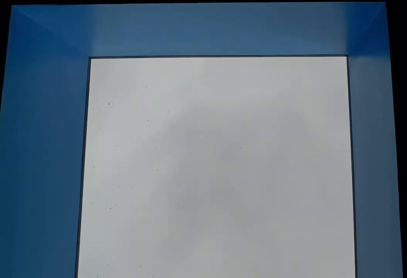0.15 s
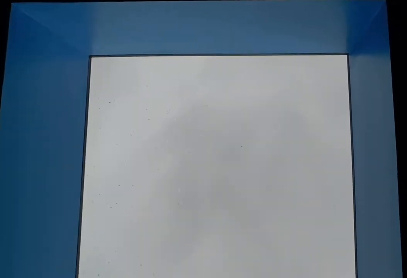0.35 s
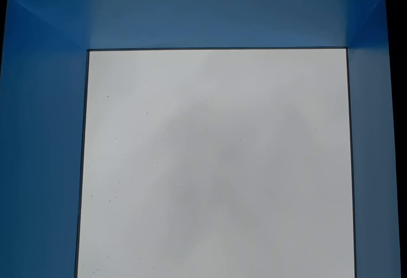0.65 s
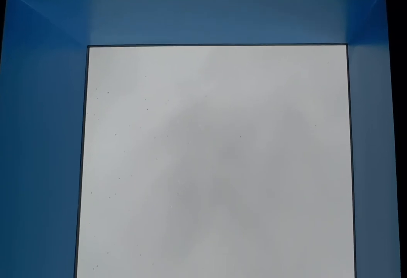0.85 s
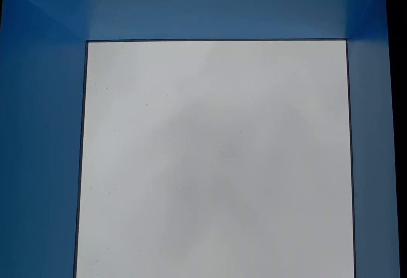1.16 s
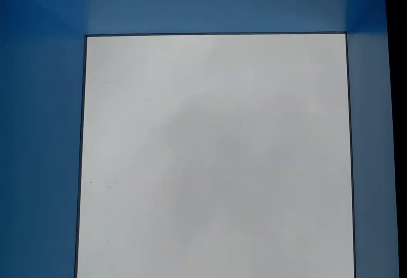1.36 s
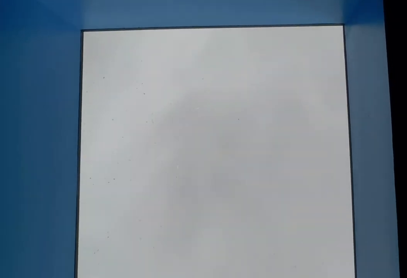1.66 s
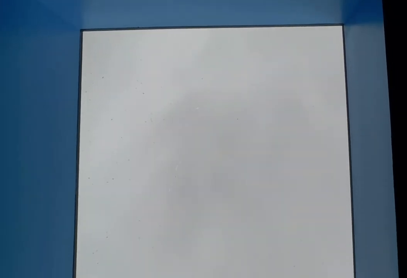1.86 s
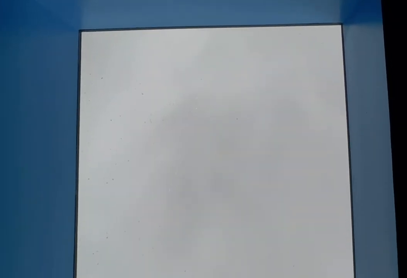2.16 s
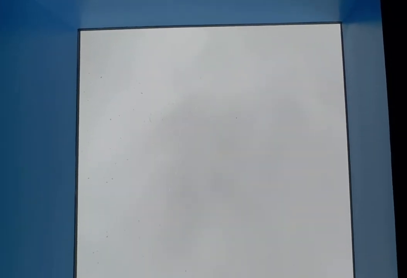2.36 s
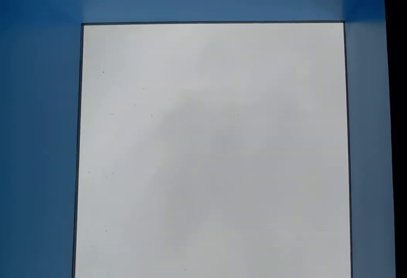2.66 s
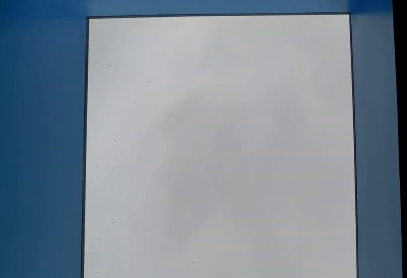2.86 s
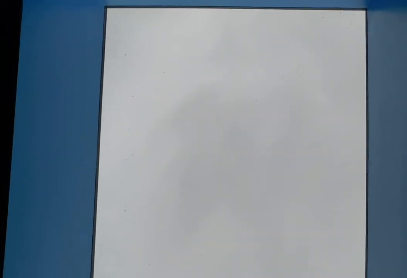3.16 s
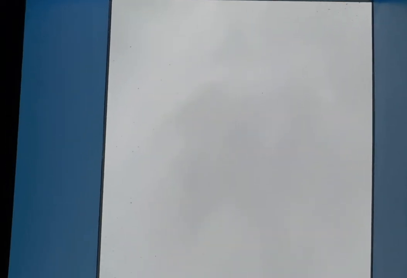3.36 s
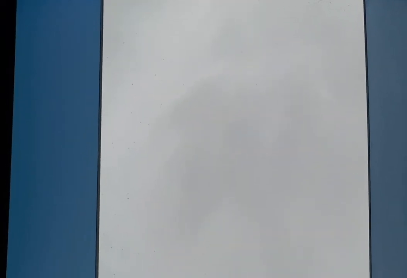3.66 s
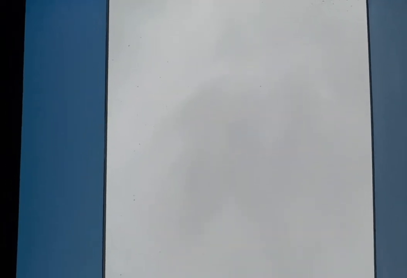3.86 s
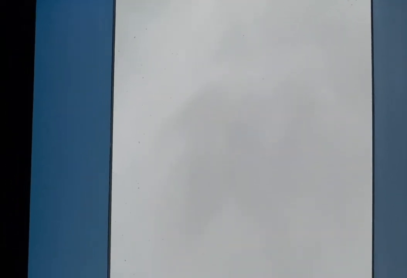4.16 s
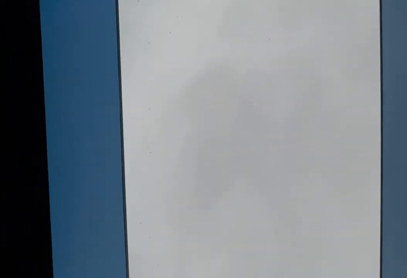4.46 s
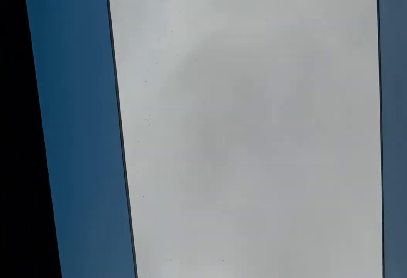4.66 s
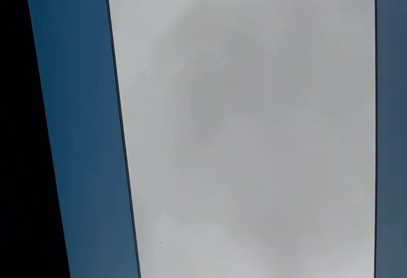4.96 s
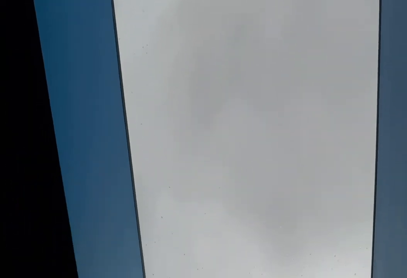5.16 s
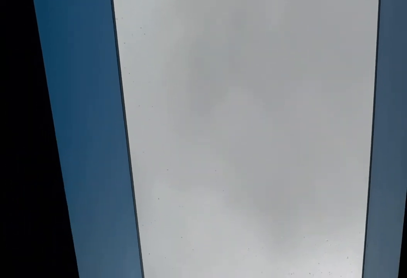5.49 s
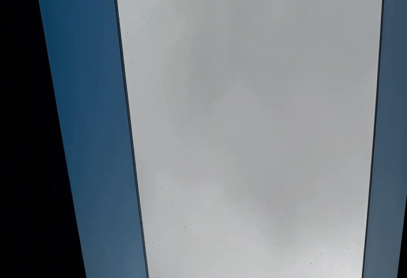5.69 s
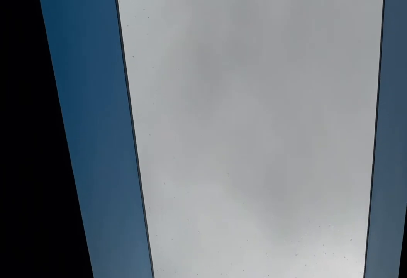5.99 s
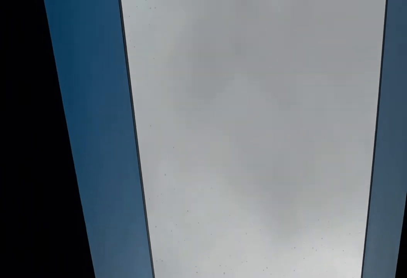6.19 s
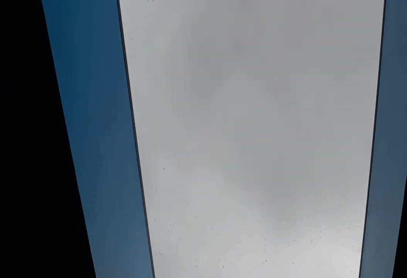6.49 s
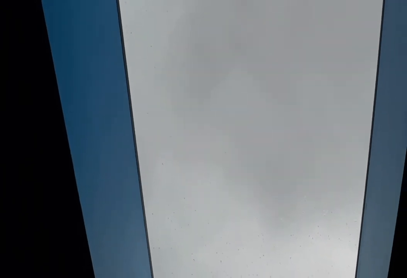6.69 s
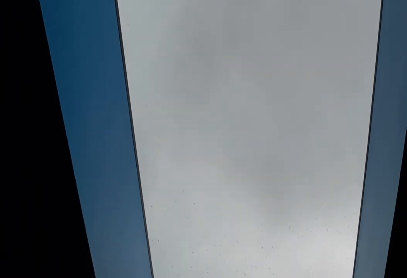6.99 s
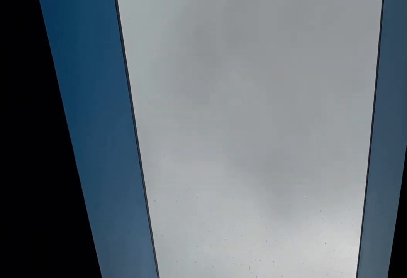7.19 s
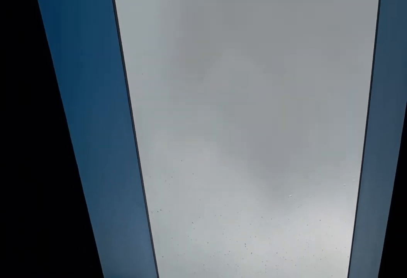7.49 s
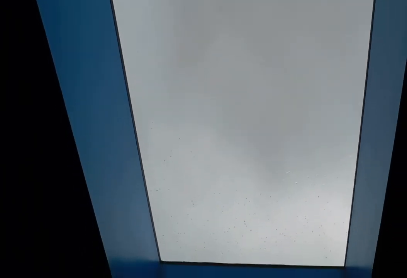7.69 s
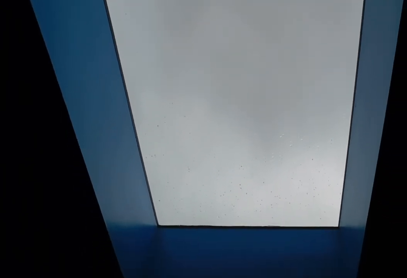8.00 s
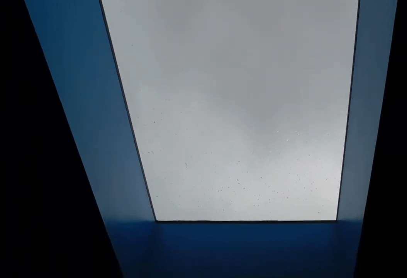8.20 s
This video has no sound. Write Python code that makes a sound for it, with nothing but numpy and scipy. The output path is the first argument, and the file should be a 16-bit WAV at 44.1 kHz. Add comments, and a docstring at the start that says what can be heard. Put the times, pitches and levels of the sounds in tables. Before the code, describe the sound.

Light rain falls on a glass skylight, heard from the quiet room below on a hand-held stereo microphone. Half a second in, a very loud, hard double rattle strikes close on the right. Around three seconds fingers click, clack and rub the casing with a soft bump. Then the drops gradually crowd together, brighter and busier, with sharper ticks from larger drops.

```python
"""Light rain on a glass skylight, heard in the room below on a hand-held stereo camera; the shower thickens.
Each drop is a noise burst of ticks plus a short ring of glass and light shaft; the ticks brighten with the tilt.
Close to the microphones, housing modes give a loud rattling knock and later a faint one.
Gripping fingers add clacks, ticks, grainy rubs, a soft bump and low rumble, over the still air of the room."""
import sys
import numpy as np
from scipy import signal
from scipy.fft import rfft, irfft
from scipy.io import wavfile

SR = 44100
rng = np.random.default_rng(int(sys.argv[2]) if len(sys.argv) > 2 else 0)


def dump_mix(stems):
    """Bounce the given channels to the path in sys.argv[1] as a 16-bit WAV at rate SR."""
    frames = np.atleast_2d(stems).T  # one column per channel
    limited = np.clip(frames, -1, 1)  # hard clip at full scale
    pcm = np.round(limited * 32767).astype(np.int16)
    wavfile.write(sys.argv[1], SR, pcm)


N = 367794
T = np.arange(N) / SR  # t/s

# strength of the shower overhead: [t/s, relative level/dB]
SHOWER_STRENGTH = [(0.0, -62.5), (0.59, -64.5), (1.31, -63.5), (1.74, -65.5), (1.94, -65.5), (2.2, -62.5),
                   (2.75, -62.5), (3.85, -63), (4.02, -63), (4.22, -61.5), (6.0, -58.5), (6.44, -60),
                   (7.41, -57), (8.0, -57), (8.34, -59)]
# largest drops on the pane: [t/s, relative level/dB, tick gain from 13 kHz up against 9 kHz and below/dB]
LARGE_DROPS = [(.021, -41, 2), (.149, -48, 0), (.181, -42.5, 0), (.389, -44, -2), (.842, -38, -2),
               (.868, -42.5, 0), (.9687, -44, 6), (1.0815, -39.5, 0), (1.2416, -43, 6), (1.9637, -41, -3),
               (2.0637, -39.5, 4), (2.1707, -38.5, 2), (2.3814, -39.5, 0), (2.7464, -42, 6),
               (3.7227, -36.5, -3), (4.0202, -38.5, -2), (4.0782, -41, 1), (4.1807, -41, 1),
               (4.7406, -39, 1), (4.9137, -41, 0), (5.609, -39, 2), (5.9507, -39, 1), (6.0465, -39, 2),
               (6.3967, -40.5, 2), (6.6306, -40.5, 1), (6.7141, -37.5, 0), (6.8059, -36, 0),
               (6.9361, -37, 1), (6.978, -34.5, -1), (7.121, -37, 0), (7.1771, -38.5, 2), (7.2233, -39, 2),
               (7.2454, -35.5, 1), (7.3417, -36.5, -4), (7.798, -39, -2)]
# ring of the pane as it reaches the room: [f/Hz, relative level/dB]
PANE_COLOUR = [(90, -23.5), (160, -12), (300, -7.5), (480, -6), (750, -2), (1200, -2.5), (1750, -0.5),
               (2050, -1), (2450, 1), (3100, -3), (4000, -8.5), (6000, -12.5), (15000, -26.5)]
# splash of a drop on the glass: [f/Hz, relative level/dB]
SPLASH_COLOUR = [(300, -21), (1500, -7), (3500, -7), (5800, -2), (8500, 3), (11000, 2), (13500, -1),
                 (16000, -6)]
# tilt of the camera up under the pane: [t/s, share of the turn/0-1]
CAMERA_TILT = [(0, 0), (2.6, .1), (5, 0.84)]
# loose part striking the housing: [t/s, relative blow level/dB, relative level of the chatter after it/dB]
HOUSING_BLOWS = [(0.5067, 12, -5), (.5169, 10, 4), (2.5795, -4, -32)]
# grazes on the way to each blow: [time ahead of it/s, level under it/dB]
BLOW_GRAZES = [(.0035, 15), (0.00089, 8)]
# modes of the housing: [f/Hz, relative level/dB, t60/s]
HOUSING_MODES = [(980, -22, .012), (1140, -10.5, 0.011), (1470, -12, 0.017), (2200, -32, .014),
                 (2460, -12, 0.01), (3480, -15, 0.022), (3940, -7, 0.014), (4130, -1.5, 0.015),
                 (4720, 1, 0.011), (5750, -5.5, 0.012), (6450, -16, 0.013), (9150, -9, 0.013),
                 (10900, -22, .006)]
# clatter of the housing through the air: [f/Hz, relative level/dB]
CLATTER_COLOUR = [(100, -15), (350, -31.5), (620, -12), (950, -8), (1400, -3), (1900, -0.5), (2600, -2.5),
                  (4300, -4), (6000, -9.5), (15000, -24)]
# crack of two hard faces meeting: [f/Hz, relative level/dB]
CRACK_COLOUR = [(300, -19), (1000, -8), (4500, 3.5), (6500, 1), (7800, -22), (10000, 0), (13000, -11.5),
                (16000, -16)]
# fingers catching on the shell:
# [t/s, relative clack level/dB, relative tick level/dB, rocking level/dB, left minus right of clack and tick/dB]
GRIP_SHIFTS = [(2.8598, -15, -19.5, -54, -9), (2.8652, -20, -20, -66, -8), (2.8937, -17, -15, -66, -7),
               (3.0325, -17, -18, -59, -1), (3.157, -9, -10, -49.5, -2), (3.4284, -37, -13, -80, 2),
               (3.534, -30, -9, -79.5, 5), (3.5464, -16, -8.5, -80, 5), (3.5563, -6.5, -9, -58, 4.5),
               (3.704, -19, -42, -70, -4), (3.745, -16, -38, -66, 0)]
# dull clack of a finger: [f/Hz, relative level/dB]
CLACK_COLOUR = [(100, -15), (300, -12), (550, -5.5), (750, -8.5), (1130, 0), (1600, -5.5), (2600, -8.5),
                (5000, -12), (15000, -33)]
# bright tick of a finger, also the colour of the rubs: [f/Hz, relative level/dB]
TICK_COLOUR = [(100, -26), (500, -5), (3000, -15), (4900, -4.5), (6200, -6), (9000, -4), (10800, -0.5),
               (12500, -5.5), (16000, -16)]
# skin sliding over the shell: [start t/s, length/s, level before the fades/dB, left minus right/dB]
SKIN_RUBS = [(2.9, 0.031, -44.5, -2), (2.933, 0.088, -49.5, -3), (3.467, 0.075, -46.5, 2),
             (3.535, .034, -38.5, 1)]
# rumble of the hand holding the camera: [t/s, level/dB]
HAND_RUMBLE = [(0, -70), (1.1, -78), (2.2, -74), (3.3, -71), (3.9, -81), (8.34, -84)]
# still air of the room: [f/Hz, relative level/dB]
ROOM_COLOUR = [(20, -1), (40, -1), (70, -3.5), (150, -5.5), (500, -8), (3000, -4), (15000, -22.5)]
# likeness of the two microphones: [f/Hz, correlation]
MIC_LIKENESS = [(60, 0.63), (300, 0.8), (700, 0.78), (1400, 0.61), (2400, 0.17), (4000, 0), (15000, 0.053)]
# balance of the two microphones, the right one duller in the top treble: [f/Hz, left minus right/dB]
MIC_BALANCE = [(100, -1), (1300, -2), (2400, -2.5), (5000, -2.5), (8500, -3.5), (10500, -0.5), (12500, 7),
               (15000, 6.5)]

# at the reference strength of the shower: tick level before a trim, level of the pane's ring, drops a second
REFERENCE_DB, PANE_DB, DROPS_PER_S = -57.5, -47, 750
RING_SLOPE, CROWD_SLOPE = 0.43, 1.3  # dB of ring and of drop rate per dB of shower
# with the camera turned fully away: corner, change of the treble above it, change of left minus right
SHADE_HZ, SHADE_DB, AWAY_PAN_DB = 10200, -7.5, -1.5
FLIGHT_S, BOUNCE_S, BOUNCE_DB = 0.005, 0.003, -1.5  # first rebound, gap between the next, change at each
ROCK_HZ, ROCK_T60_S = 45, 0.078  # the body rocks in the hand at one low pitch
# soft bump as the hand settles, nearer the left microphone
BUMP_S, BUMP_DB, BUMP_PAN_DB, BUMP_HZ, BUMP_T60_S = 3.558, -32, 4, 144, 0.025
TOP_HZ = 15750  # upper limit of the recorder


def rain(facing_pan_db=1.1, facing_top_db=2.1):
    """Even ring in the room, and directional ticks that brighten as the microphones turn to them."""
    rings, ticks = np.add(drizzle(), large_drops())
    away = 1 - np.interp(T, *np.transpose(CAMERA_TILT))
    high_pass = signal.butter(3, SHADE_HZ, "high", fs=SR, output="sos")
    top = signal.sosfiltfilt(high_pass, ticks)
    ticks = ticks - top + top * amp(facing_top_db + SHADE_DB * away)
    return rings + ticks * sides(facing_pan_db + AWAY_PAN_DB * away)


def drizzle(ring_spread_db=2.0, tick_spread_db=3.0, tick_db=6, count=12):
    """Small uneven drops land on many spots; as the shower grows they crowd and ticks gain more than rings."""
    strength_db = np.interp(T, *np.transpose(SHOWER_STRENGTH)) - REFERENCE_DB
    rate = DROPS_PER_S * amp(CROWD_SLOPE * strength_db)
    rings, ticks = 0, 0
    for _ in range(count):
        # dividing by the root of the rate keeps crowding from raising the level
        lands = (rng.random((1, N)) < rate / count / SR) / np.sqrt(rate)
        size = np.minimum(rng.exponential(size=N), 3.6)
        ring_hits = lands * amp(ring_spread_db * size)
        tick_hits = lands * amp(tick_spread_db * size)
        rings = rings + signal.fftconvolve(ring_hits, pane_ring())[:, :N]
        ticks = ticks + signal.fftconvolve(tick_hits, splash())[:, :N]
    rings = level(rings) * amp(PANE_DB + RING_SLOPE * strength_db)
    ticks = level(ticks) * amp(REFERENCE_DB + strength_db + tick_db)
    return rings, ticks


def large_drops(tick_db=18.5, ring_db=18):
    """Heavier drops stand out of the patter, each with its ring and its tick."""
    rings, ticks = np.zeros((2, 2, N))
    for s, db, sharp_db in LARGE_DROPS:
        tick = colour(splash(), [(9000, 0), (13000, sharp_db)])
        # both start about 1 ms after the listed time
        add(rings, s + 0.001015, amp(db + ring_db) * pane_ring())
        add(ticks, s + 0.001, amp(db + tick_db) * tick)
    return rings, ticks


def splash(echo_db=-2):
    """A drop spreads and bursts on the glass; the walls of the shaft scatter its tick."""
    direct = burst(SPLASH_COLOUR, t60=0.0078, rise=0.001)
    scattered = burst(SPLASH_COLOUR, t60=0.12, rise=0.003)
    return unit(direct + amp(echo_db) * scattered)


def pane_ring(room_db=0):
    """The pane rings under a drop, and the room holds the ring a little longer."""
    return unit(burst(PANE_COLOUR, t60=0.063) + amp(room_db) * burst(PANE_COLOUR, t60=0.36))


def housing_knocks(air_db=-9.0, crack_db=-10, room_db=-29, tone_db=-66, rock_db=-60, bump_db=-52, grit=0.1):
    """Contacts ring the housing beside the right microphone; a duller clatter reaches both through the air."""
    near = sum(amp(db) * ring(hz, t60) for hz, db, t60 in HOUSING_MODES)
    near = unit(colour(near, [(100, -9), (500, -5.5), (900, 6), (7000, -1.0), (11000, -2), (16000, -24)]))
    # what reaches the left microphone
    far = colour(near, [(300, -16), (1100, -10), (2500, -15), (5000, -24), (11000, -12)])
    modes = np.vstack([far, near])
    out = np.zeros((2, N))
    for knock_s, blow_db, chatter_db in HOUSING_BLOWS:
        for s, db in contacts(knock_s, blow_db, chatter_db):
            # rough faces scrape as they meet
            push = grit * rng.standard_normal((2, 256)) * fade(0.0066, size=256)
            push[:, 0] += 1
            body = signal.fftconvolve(unit(push), modes, axes=-1)[:, :modes.shape[1]]
            clatter = amp(air_db) * burst(CLATTER_COLOUR, t60=0.088, rise=0.0013)
            crack = amp(crack_db) * burst(CRACK_COLOUR, t60=0.0083)
            room = amp(room_db) * burst(PANE_COLOUR, t60=0.32)
            add(out, s, amp(db) * (body + clatter + crack + room))
        # one long mode lingers
        add(out, knock_s, amp(blow_db + tone_db) * ring(1610, t60=0.72))
        rock = amp(rock_db) * thud(ROCK_HZ, ROCK_T60_S)
        bump = amp(bump_db) * thud(BUMP_HZ, BUMP_T60_S)
        add(out, knock_s, amp(blow_db) * (rock + bump))
    return out


def contacts(s, blow_db, chatter_db, count=3):
    """One knock as (t/s, level/dB) contacts: the grazes, the blow and a few rebounds."""
    grazes = [(s - ahead, blow_db - under_db) for ahead, under_db in BLOW_GRAZES]
    rebounds = [(s + FLIGHT_S + k * BOUNCE_S, chatter_db + k * BOUNCE_DB) for k in range(count)]
    return grazes + [(s, blow_db)] + rebounds


def fingers(clack_db=-1, tick_db=0, slip_db=6.0):
    """Fingers shift their grip: ticks that rock the body, grainy rubs, a soft bump and a low rumble."""
    out = np.zeros((2, N))
    for s, dull_db, bright_db, rock_db, pan_db in GRIP_SHIFTS:
        clack = amp(dull_db + clack_db) * burst(CLACK_COLOUR, t60=0.016)
        tick = amp(bright_db + tick_db) * burst(TICK_COLOUR, t60=0.0075, rise=0.00019)
        rock = amp(rock_db) * thud(ROCK_HZ, ROCK_T60_S)
        add(out, s, (clack + tick) * sides(pan_db) + rock)
    for s, length, db, pan_db in SKIN_RUBS:
        size = int(length * SR)
        # a new random grip every 32 samples makes the grain
        grip = np.repeat(rng.standard_normal(size // 32 + 1), 32)[:size]
        slips = rng.standard_normal((2, size)) * amp(slip_db * grip)
        rub = level(colour(slips, TICK_COLOUR)) * signal.windows.tukey(size)
        add(out, s, amp(db) * rub * sides(pan_db))
    add(out, BUMP_S, amp(BUMP_DB) * thud(BUMP_HZ, BUMP_T60_S) * sides(BUMP_PAN_DB))
    rumble = colour(diffuse(N), [(15, 4), (30, 3), (60, -7), (200, -40), (1000, -68)])
    return out + level(rumble) * amp(np.interp(T, *np.transpose(HAND_RUMBLE)))


def thud(hz, t60):
    """A low swing of the camera body, dulled by soft flesh."""
    flesh = [(20, -4), (45, 3.5), (200, 2), (400, 9), (800, 8), (1400, -6), (3000, -40)]
    return colour(ring(hz, t60), flesh)


def ring(hz, t60):
    """One struck mode: a cosine that dies away exponentially."""
    decay = fade(t60)
    return (decay * np.cos(2 * np.pi * hz * T[:len(decay)]))[None]


def burst(points, t60, rise=0.00037, size=16384):
    """Dense modes as noise that swells quickly and dies away together, with unit energy."""
    swell = 1 - np.exp(-T[:size] / rise)
    return unit(colour(diffuse(size) * swell * fade(t60, size), points))


def room_air(room_db=-63):
    """The quiet room: steady coloured noise at both microphones."""
    return amp(room_db) * level(colour(diffuse(N), ROOM_COLOUR))


def diffuse(size):
    """Noise at two close microphones: more alike in the bass, nearly unrelated in the treble."""
    mid, side = rfft(rng.standard_normal((2, size)))
    alike = np.clip(on_bins(MIC_LIKENESS, size), -1, 1)
    mid, side = mid * np.sqrt(1 + alike), side * np.sqrt(1 - alike)
    left_right = np.array([mid + side, mid - side])
    return irfft(left_right * sides(on_bins(MIC_BALANCE, size)), size)


def colour(x, points):
    """Causal minimum-phase filter with the given (f/Hz, level/dB) response."""
    size = 4096
    cepstrum = irfft(np.log(amp(on_bins(points, size))))
    # fold the cepstrum onto positive time
    cepstrum[1:size // 2] *= 2
    cepstrum[size // 2 + 1:] = 0
    response = irfft(np.exp(rfft(cepstrum)))
    return signal.fftconvolve(x, response[None], axes=-1)[:, :x.shape[1]]


def on_bins(points, size):
    """Read (f/Hz, value) points at the bins of a transform, on a log frequency axis."""
    hz, value = np.transpose(points)
    bins_hz = np.fft.rfftfreq(size, 1 / SR) + 1  # 1 Hz up, to avoid log of zero
    return np.interp(np.log(bins_hz), np.log(hz), value)


def fade(t60, size=16384):
    """Exponential decay, 60 dB down after t60 seconds."""
    return np.exp(-np.log(1000) * T[:size] / t60)


def add(out, s, sound):
    """Mix a sound in at a time in seconds."""
    start = max(int(s * SR), 0)
    part = sound[:, :N - start]
    out[:, start:start + part.shape[1]] += part


def amp(db):
    """Decibels to gain."""
    return 10 ** (np.asarray(db) / 20)


def sides(db):
    """Left and right gains for a level difference, left minus right."""
    return amp(np.array([[0.5], [-0.5]]) * db)


def unit(x):
    """Scale to a mean energy of one per channel."""
    return x / np.sqrt(np.mean(np.sum(x ** 2, axis=-1)))


def level(x):
    """Scale to an rms of one."""
    return x / np.sqrt(np.mean(x ** 2))


def scene():
    """Rain overhead, handling noise close by, and the quiet room."""
    return rain() + housing_knocks() + fingers() + room_air()


def record(dry):
    """The recorder clips at full scale, then a steep low-pass cuts the top."""
    low_pass = signal.ellip(10, 0.2, 70, TOP_HZ, fs=SR, output="sos")
    return signal.sosfilt(low_pass, np.clip(dry, -1, 1))


dry = scene()
out = record(dry)
dump_mix(out)
```